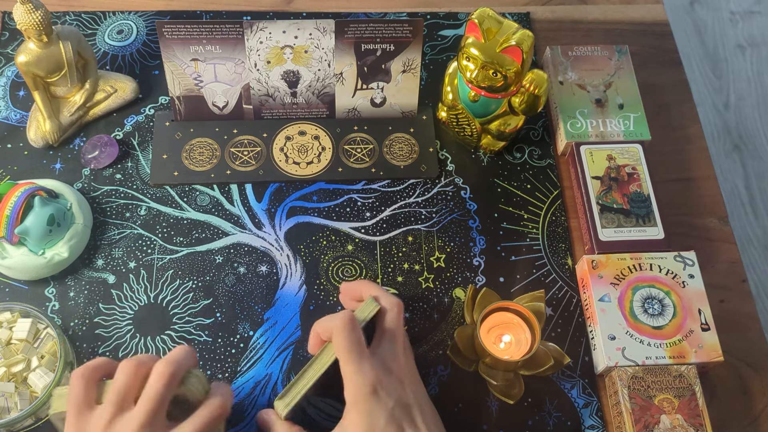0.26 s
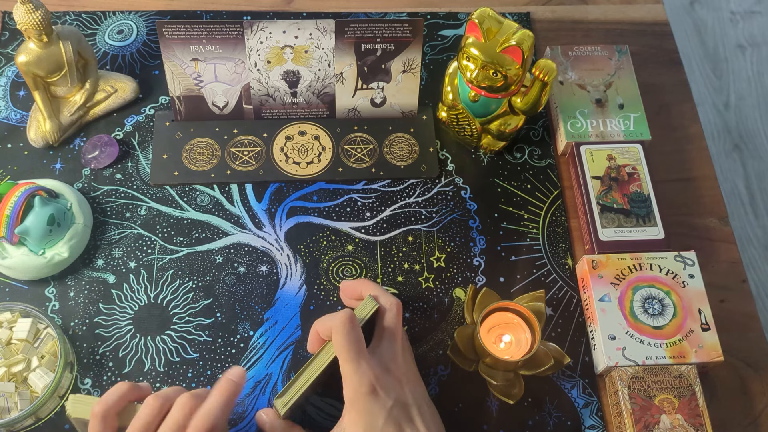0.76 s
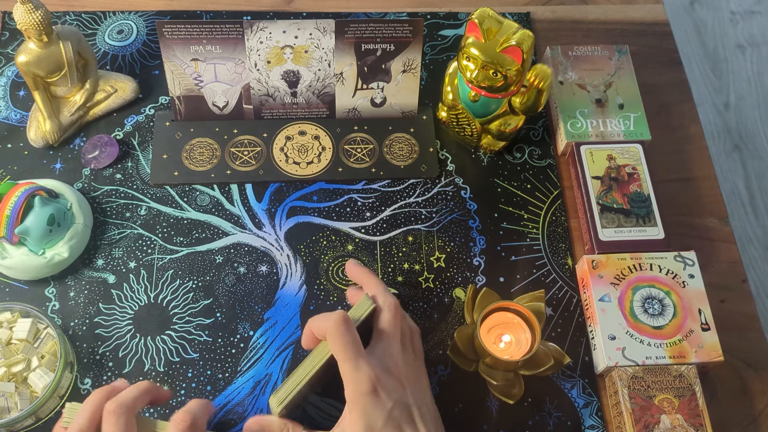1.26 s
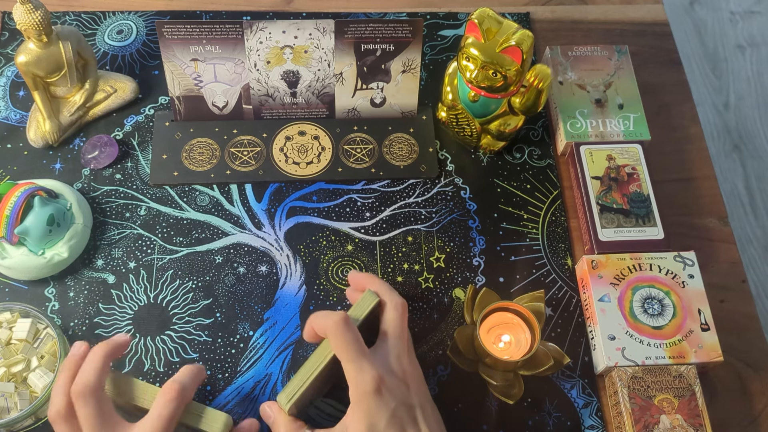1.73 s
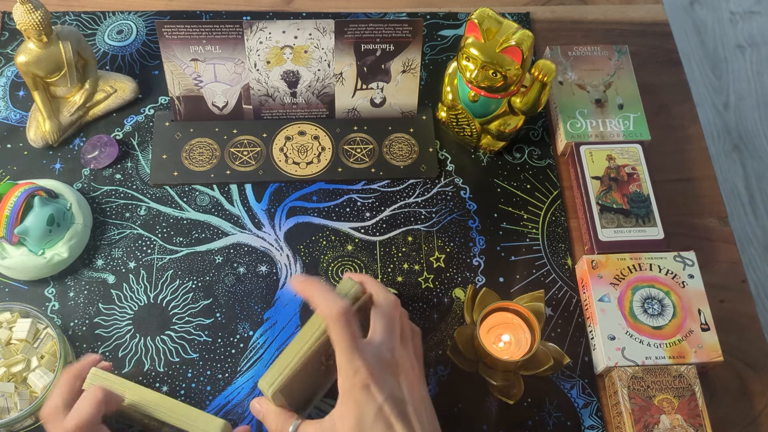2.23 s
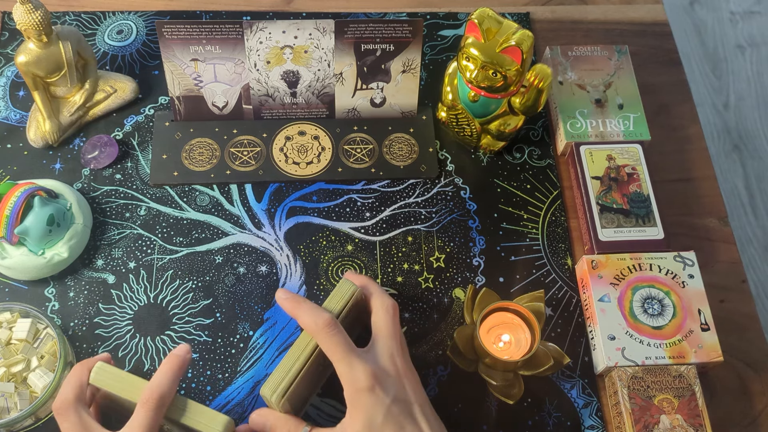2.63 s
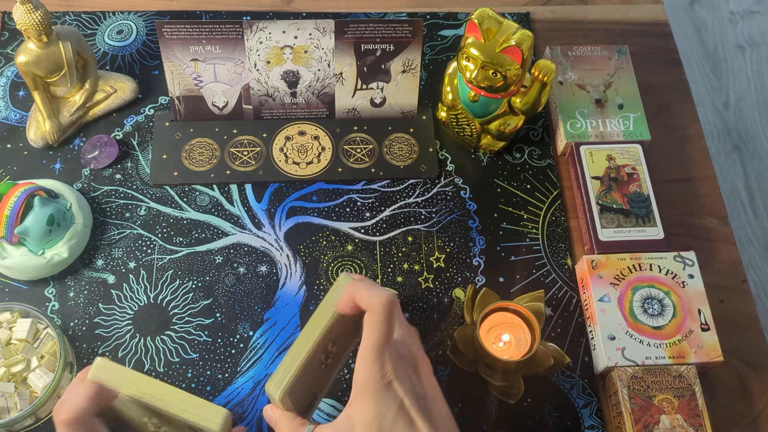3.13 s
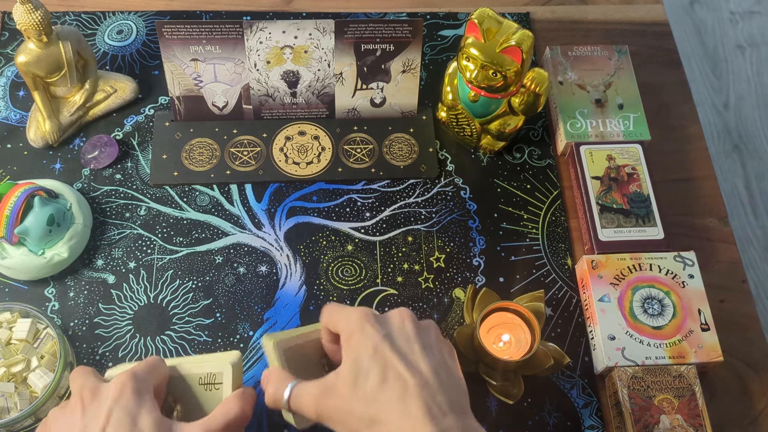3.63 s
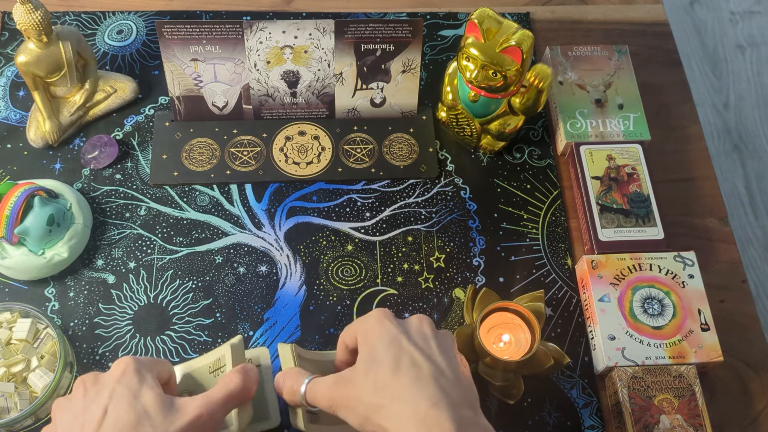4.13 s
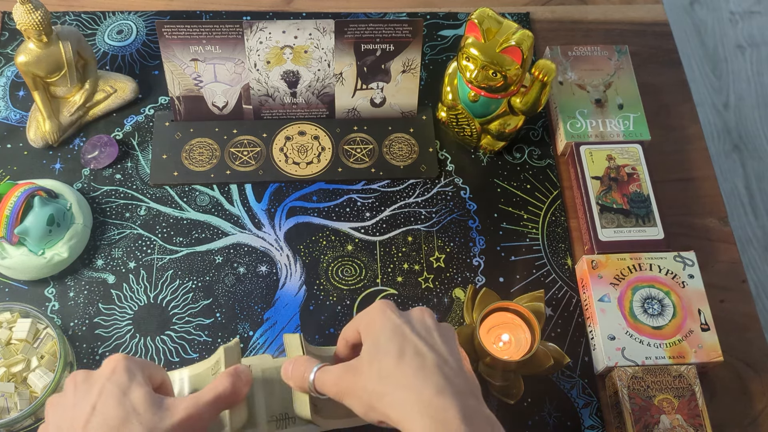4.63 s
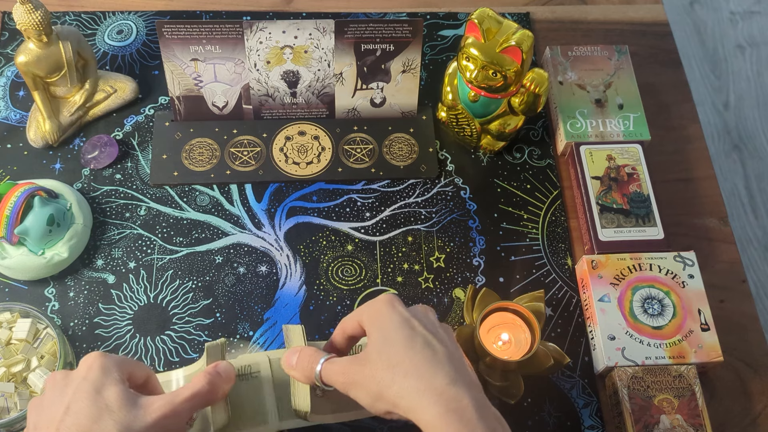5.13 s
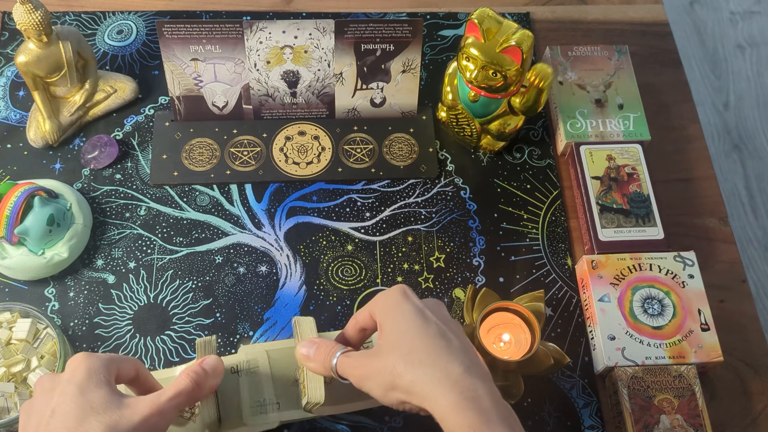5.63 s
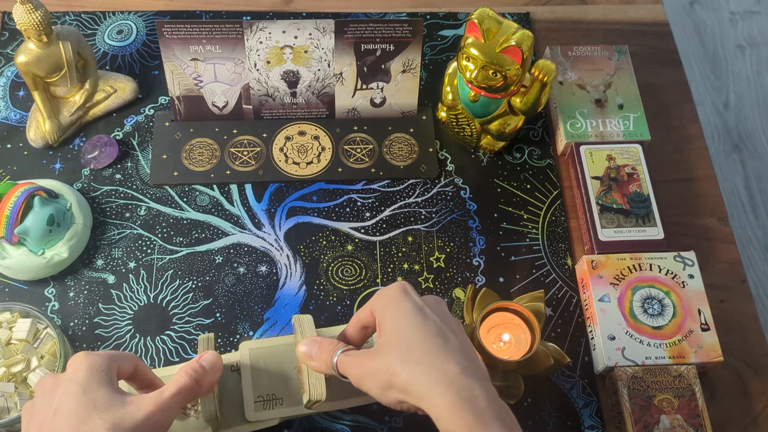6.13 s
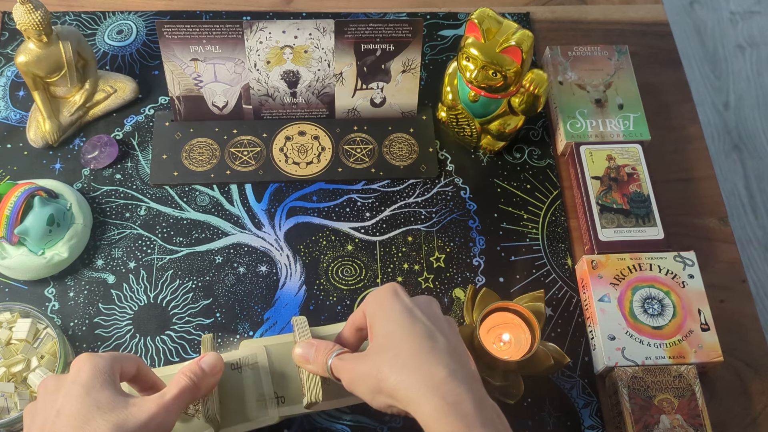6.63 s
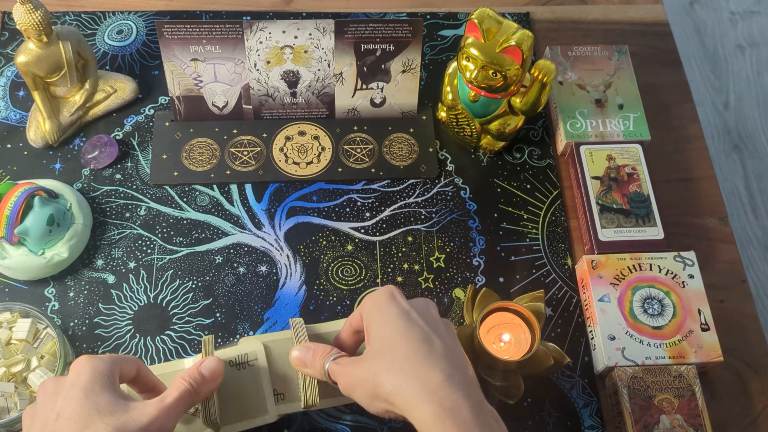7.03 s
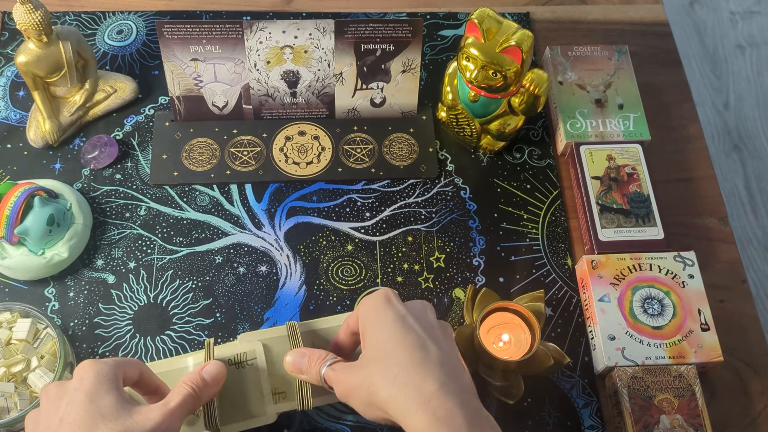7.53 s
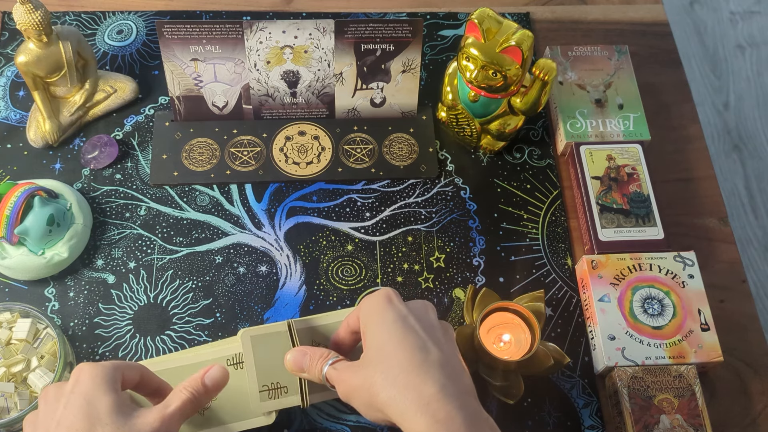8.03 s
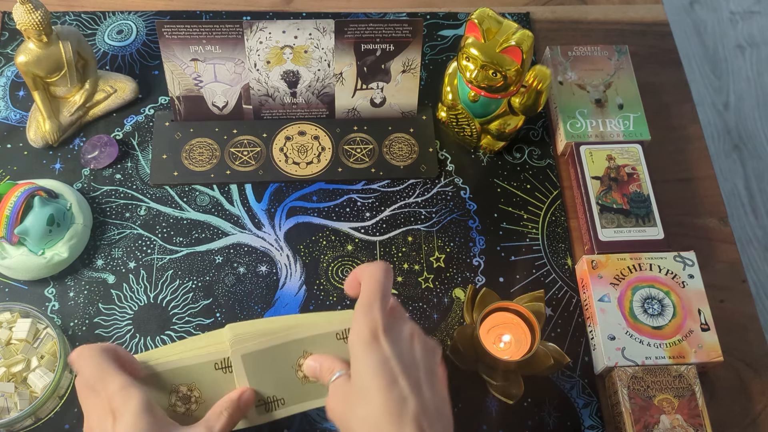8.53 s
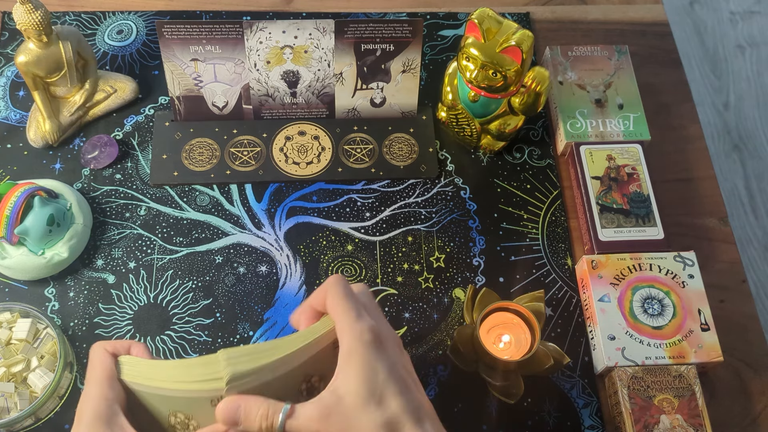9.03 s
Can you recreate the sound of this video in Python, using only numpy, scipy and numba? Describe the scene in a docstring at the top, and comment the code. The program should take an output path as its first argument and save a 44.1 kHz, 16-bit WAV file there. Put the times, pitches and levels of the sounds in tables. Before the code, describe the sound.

Two halves of a deck of stiff cards are knocked square on a cloth-covered wooden table, making a few dull thuds. After a pause comes a slow riffle shuffle: cards spring off the thumbs in sharp, uneven cracks and pat onto the pile. Soft sliding and creaking follow as the halves are pushed together. It sounds close, in a small, slightly echoing room with a low hum.

```python
"""Stiff playing cards are riffled: each bent card springs off the thumb with a crack and a clack,
then pats onto the pile. Beforehand the two half decks are knocked square, exciting the modes of a
cloth-covered wooden table. Friction adds slides, creaks and brushing, last as the halves are pushed
together and arched. A small, live room reverberates over mains hum, rumble and faint hiss."""
import sys
import numpy as np
from scipy import signal
from scipy.fft import rfft, irfft
from scipy.io import wavfile
from numba import njit

SR = 44100
rng = np.random.default_rng(int(sys.argv[2]) if len(sys.argv) > 2 else 0)


def file_out(sig):
    """Save sig as 16-bit WAV at sys.argv[1]."""
    # one column per channel
    cols = np.atleast_2d(sig).T
    # limit, then scale
    lim = np.clip(cols, -1, 1)
    pcm = np.round(lim * 32767).astype(np.int16)
    wavfile.write(sys.argv[1], SR, pcm)


N = 408807

# Cards leaving the thumb. Each row: time in seconds, crack level in dB, crack resonance in Hz, clack
# level in dB, clack resonance in Hz, first-touch level in dB, pat level in dB, left minus right in dB.
# Event levels in all tables are relative: each source adds its own gain.
SNAPS = [(4.6587, -37, 8000, -24.5, 4600, -27, -36, -1), (4.7287, -25, 8000, -34, 3500, -40, -36, 4),
         (4.7535, -25, 7500, -38, 3200, -25.5, -28, -6), (4.8102, -25, 11000, -34, 2200, -27.5, -22, -1),
         (4.820, -31, 8000, -22.5, 4100, -36, -26, 1), (5.291, -34, 11000, -47, 2800, -29.5, -27.5, 6),
         (5.3365, -30, 11000, -35, 2500, -25, -20, 0.5), (5.4336, -32.5, 11000, -55, 3000, -30, -27, 2),
         (5.4562, -19.5, 10500, -38, 4200, -36, -35, 3.5), (5.5096, -16.5, 10500, -34, 3500, -26, -26, 0),
         (5.5792, -26.5, 9000, -40, 3000, -30.5, -27, 3.5), (5.68, -21, 10500, -41, 2800, -30.5, -26, -0.5),
         (5.7306, -2, 11000, -34, 4400, -42.5, -41, 0), (5.785, -4.5, 10300, -31, 3800, -31.5, -32, 5),
         (5.936, -2, 7700, -27, 4600, -28.5, -35, 3), (6.091, -17, 10500, -36, 2600, -34, -25, 0),
         (6.136, -1, 10000, -31, 3600, -35.5, -35, 2), (6.2065, -14.5, 9000, -31, 2000, -30, -25, 1),
         (6.329, -7, 8000, -23.5, 3700, -39.5, -25, 5), (6.4557, -15, 7000, -31, 2800, -47, -35, 0),
         (6.5372, -24, 8500, -36.5, 3000, -31, -32, 7), (6.5549, -1.5, 7200, -34, 3300, -44, -43.5, 3),
         (6.6578, -3, 10200, -28, 3200, -32.5, -39, 2.5), (6.7703, 0.5, 6900, -24.5, 3500, -47.5, -45, 0.5),
         (7.074, -17, 8500, -39, 2600, -41.5, -28, 1), (7.1559, -.5, 8400, -32, 2900, -48.5, -48, 4),
         (7.3772, -13, 6300, -26, 2600, -35.5, -31, 3), (7.4176, -15.5, 7000, -31, 2600, -31, -26, 7),
         (7.467, -10.5, 8300, -25, 2700, -39, -29.5, 2), (7.5253, -13, 7500, -30.5, 2500, -31.5, -24.5, 3),
         (7.5914, -10.5, 7500, -29, 2600, -36.5, -28, 2.5), (7.6473, -13, 8000, -34, 2800, -33.5, -29, 3),
         (7.7532, -.5, 7400, -25.5, 3200, -44, -35, 3.5), (7.7811, -2, 8700, -30, 3900, -34.5, -35, 6.5),
         (7.935, -12, 7500, -31, 3100, -29, -29, 4.5), (8.0043, -3.5, 8800, -21, 3700, -45, -32, 2),
         (8.122, -14, 8500, -24, 3800, -40, -27, 5), (8.269, -56, 6500, -38, 5400, -37, -33, 6.5),
         (8.983, -40.5, 9500, -55, 4800, -69, -61, 0)]
# Half decks striking the table. Each row: time in seconds, level in dB, low-pass corner in Hz, tick
# level in dB, table ring against the blow in dB, settling delay in seconds, its level in dB, its corner
# in Hz, grazing time in seconds, last graze level in dB, boom level in dB.
KNOCKS = [(0.3625, -9.5, 760, -33, -1, .011, -13, 450, 0.038, -17.5, -64),
          (0.679, -23.5, 650, -46, 0, .0133, -14, 400, 0.0002, -60, -63),
          (0.801, -17, 1220, -34, -2.5, .0133, -14.5, 400, 0.022, -22.5, -60),
          (1.690, -6, 2070, -10, -1, .011, -14, 400, .023, -10.5, -36),
          (1.720, -16, 2000, -23, -1, .011, -18, 600, 0.0002, -60, -60),
          (2.621, -15, 850, -40, -4, .011, -10.5, 560, 0.00077, -60, -37),
          (2.650, -15.5, 680, -46, -6, .011, -17, 300, 0.00077, -60, -56),
          (4.042, -40, 2020, -50, -4, .0133, -53, 400, 0.0029, -70, -82),
          (4.079, -39.5, 2000, -46, -10, .0133, -52, 400, 0.0058, -70, -87)]
# Friction spectrum of card on card. Each row: frequency in Hz, gain in dB.
CARD_FRICTION = [(300, -22.5), (1000, -11), (2000, -4), (3500, -4.5), (4600, -5.5), (6600, -0.5),
                 (9000, -11), (15000, -24.5)]
# Friction spectrum of skin on card edges. Each row: frequency in Hz, gain in dB.
SKIN_FRICTION = [(700, 2), (2000, 2.5), (4000, -2.5), (6500, -1.5), (9500, -8), (12000, -10),
                 (16000, -21.5)]


def snaps(crack_gain_db=7, clack_gain_db=21.2, lead=256):
    """Elastic release: a freed edge radiates a bright crack, and the flexing card a dry clack."""
    # Spectra of the edge, left and right, and of the card's body. Each row: frequency in Hz, gain in dB.
    edge_left = [(300, -36), (1500, -35), (4200, -15.5), (5500, -4), (7200, 0.5), (10800, 0), (12500, -9),
                 (15400, -11), (16500, -35)]
    edge_right = [(300, -29), (1500, -29), (4200, -15.5), (5500, -.5), (7200, -1.5), (10500, -5),
                  (12000, -4.5), (13500, -1), (15300, 1.5), (16500, -26)]
    card_body = [(200, -15), (600, -11), (1500, 1), (2400, 3.5), (3400, 2), (4400, -5), (5400, -0.5),
                 (6500, -6.5), (9000, -6), (16000, -12.5)]
    out = np.zeros((2, N))
    for s, crack_db, crack_hz, clack_db, clack_hz, _, _, pan_db in SNAPS:
        flutter_s = 0.0028 * np.exp(0.3 * rng.standard_normal())
        crack = burst(decay_s=.00036, ring_db=-22, ring_s=.0012, alike=1, rise_s=.0003, peak_s=.00093)
        crack = whiten(np.pad(crack, ((0, 0), (lead, 0))), .7)
        # Each card is bent differently, which moves the brightest part of its crack.
        left, right = crack + from_db(-3) * resonate(crack, crack_hz, width_hz=2400)
        edge = unit_energy(np.array([colour(left, edge_left), colour(right, edge_right)]))
        flex = burst(decay_s=.0005, ring_db=7, ring_s=flutter_s, alike=-.3, rise_s=.0005, peak_s=.00085)
        clack = colour(whiten(flex, .4), card_body)
        body = unit_energy(clack + from_db(1) * resonate(clack, clack_hz, width_hz=900))
        pan = from_db([[pan_db / 2], [-pan_db / 2]])
        add(out, s - lead / SR, from_db(crack_db + crack_gain_db) * edge * pan)
        add(out, s, from_db(clack_db + clack_gain_db) * body * pan)
    return out


def catches(gain_db=13, rebound_s=.011, rebound_db=-27.5):
    """Small impacts: an edge slips and is caught by the thumb, or flicks its neighbours after a snap."""
    # Edges catching on the thumb. Each row: time in seconds, level in dB.
    thumb_catches = [(.3625, -49.5), (2.14, -56), (2.248, -60), (4.909, -43), (4.949, -43), (5.017, -42),
                     (5.103, -45), (5.1555, -44), (5.17, -47), (5.194, -41), (5.345, -37), (5.628, -34.5),
                     (6.264, -35.5), (6.319, -36), (7.038, -33.5), (7.055, -41.5), (7.064, -28),
                     (7.147, -43.5), (7.232, -30.5), (7.367, -38.5), (8.251, -33)]
    out = np.zeros((2, N))
    rebounds = [(s + delay_s, crack_db + rebound_db - rng.uniform(0, 12))
                for s, crack_db, *_ in SNAPS
                for delay_s in rebound_s * np.cumsum(rng.uniform(0.56, 2, 2))]
    for s, db in list(thumb_catches) + rebounds:
        tick = colour(burst(decay_s=.0007, ring_db=-16.5, ring_s=.003, alike=.7), SKIN_FRICTION)
        add(out, s, from_db(db + gain_db) * unit_energy(tick))
    return out


def landings(lead_s=.0135, slap_lag_s=.0095, softer=.85, riffle_start_s=4.56, fall_hz_per_s=60):
    """Staged contact: a card touches edge first, then lies flat. Yields seconds, dB and corner in Hz."""
    # Cards dropping without a snap. Each row: time in seconds, first-touch level in dB, pat level in
    # dB, low-pass corner in Hz.
    drops = [(.3628, -60, -45, 3300), (4.5685, -37.5, -24.5, 2250), (4.948, -26.5, -26.5, 2000),
             (4.999, -27.5, -27.5, 1890), (5.016, -48, -33, 1900), (5.1685, -30.5, -31, 1870),
             (5.217, -39, -35.5, 1608), (5.252, -42, -36, 1660), (5.345, -36, -27, 1700),
             (5.7675, -30.5, -30, 1762), (5.835, -44.5, -42, 1630), (6.003, -42.5, -31.5, 1550),
             (6.186, -49.5, -35.5, 1500), (6.2635, -46, -34.5, 2440), (6.277, -46.5, -30, 1090),
             (6.337, -36, -27, 390), (6.741, -37.5, -29, 1580), (7.064, -41.5, -28, 649),
             (7.231, -35, -24.5, 1820), (7.29, -29, -28, 444), (7.909, -34, -31.5, 1187),
             (7.947, -33, -35, 493), (8.052, -35, -21.5, 1400), (8.075, -35, -31, 258),
             (8.188, -37.5, -32.5, 689), (8.586, -46, -39.5, 2530)]
    for s, _, _, clack_db, _, touch_db, pat_db, _ in SNAPS:
        corner_hz = 1900 - fall_hz_per_s * (s - riffle_start_s)   # a thicker pile is softer
        yield s - lead_s, touch_db, corner_hz * softer
        yield s, pat_db, corner_hz
        # The far end of a snapped card slaps down last.
        yield s + slap_lag_s * rng.uniform(.85, 1.2), clack_db - 7.5, corner_hz * softer
    for s, touch_db, pat_db, corner_hz in drops:
        yield s - lead_s, touch_db, corner_hz * softer
        yield s, pat_db, corner_hz


def pats(gain_db=13.7, cavity_db=3.5):
    """Cavity resonance: the gap under a landing card rings briefly, lower for a softer landing."""
    out = np.zeros((2, N))
    for s, db, corner_hz in landings():
        slap = burst(decay_s=.0015, ring_db=-12, ring_s=.0038, alike=.92, peak_s=.00075)
        pat = colour(soften(whiten(slap, .7), corner_hz), card_spectrum_of_pat())
        cavity_hz = .88 * corner_hz * rng.uniform(0.75, 1.12)
        cavity = from_db(cavity_db) * resonate(pat, cavity_hz, width_hz=380)
        add(out, s, from_db(db + gain_db) * unit_energy(pat + cavity))
    return out


def card_spectrum_of_pat():
    """Impact spectrum of a card landing flat on the pile."""
    # Each row: frequency in Hz, gain in dB.
    pat_spectrum = [(60, -4.5), (150, 2.5), (220, -7), (320, 1.5), (520, 1), (900, -.5), (1450, -.5),
                    (1850, 0), (2600, -.5), (4000, -.5), (12000, 10)]
    return pat_spectrum


def contacts(graze_gap_s=.0105, graze_step_db=1.5, graze_hz=950):
    """Multiple impact: loose cards graze the table ever harder, the packet hits, then it settles."""
    for s, db, corner_hz, tick_db, ring_db, *settling, graze_s, graze_db, _ in KNOCKS:
        settle_s, settle_db, settle_hz = settling
        count = round(graze_s / graze_gap_s)
        for k in range(count):
            early_s = graze_s * (1 - k / count * rng.uniform(.8, 1.1))
            weaker_db = (count - 1 - k) * graze_step_db
            yield s - early_s, graze_db - weaker_db, graze_hz, tick_db - 31, ring_db
        yield s, db, corner_hz, tick_db, ring_db
        yield s + settle_s, settle_db, settle_hz, tick_db - 15.5, ring_db


def knocks(wood_db=-5, thud_db=11, tick_gain_db=6, thud_s=.011, tick_s=.0012, size=12000):
    """Modal excitation: a half deck thuds, ticks and rings the table's modes, differently each time."""
    # Modes of the table top. Each row: frequency in Hz, level in dB, 60 dB decay time in seconds.
    table_modes = [(122, -18, 0.14), (156, -20, 0.18), (243.3, -30, 0.092), (292.5, -19, 0.075),
                   (329.7, -20.5, 0.068), (390, -31.5, 0.05), (434.6, -29, 0.097), (567, -23.5, 0.056),
                   (647, -27.5, 0.055), (1050, -27.5, 0.03), (1185, -23.5, 0.027), (1900, -29, .015),
                   (2170, -27.5, .015), (2900, -30, .012)]
    # Spectra of the packet's dull thud and its edges' hard tick. Each row: frequency in Hz, gain in dB.
    thud_spectrum = [(60, -51.5), (130, 15), (165, 14), (220, 0), (310, 9), (480, 5), (730, 4.5),
                     (880, -4.5), (1060, 5.5), (1200, 5), (1320, 1), (1550, -4), (2200, -21), (2500, -32),
                     (2950, -25), (3600, -30), (8000, -48)]
    tick_spectrum = [(300, -14), (850, 3), (1200, 6), (1600, 0), (2150, -1), (2500, -12), (2950, -13),
                     (3600, -32), (7000, -46), (15000, -61)]
    out, t = np.zeros((2, N)), np.arange(size) / SR
    hz, mode_db, t60 = np.transpose(table_modes)[:, :, None]
    modes = from_db(mode_db - 60 * t / t60) * np.sin(2 * np.pi * hz * t)
    for s, db, corner_hz, tick_db, ring_db in contacts():
        strengths = from_db(2 * rng.standard_normal(len(modes))) * (-1) ** np.arange(len(modes))
        wood = from_db(wood_db + ring_db) * (strengths @ modes)
        landing = unit_energy(stereo(rng.standard_normal((2, size)), .87) * np.exp(-t / thud_s))
        thud = from_db(thud_db) * colour(landing, thud_spectrum)
        edges = stereo(rng.standard_normal((2, size)), .79) * np.exp(-t / tick_s)
        add(out, s, from_db(db) * soften(wood + thud, corner_hz))
        add(out, s, from_db(tick_db + tick_gain_db) * unit_energy(colour(edges, tick_spectrum)))
    return out


def boom(hz=110.1, decay_s=0.11, rise_s=0.0081):
    """Damped oscillation: the whole table swings after each knock."""
    out, t = np.zeros((2, N)), np.arange(16000) / SR
    swing = np.sin(2 * np.pi * hz * t) * np.exp(-t / decay_s) * (1 - np.exp(-t / rise_s))
    for s, *_, db in KNOCKS:
        add(out, s, from_db(db) * swing)
    return out


def slides(gain_db=-4, resonance_db=11, width_hz=560, grain_db=4):
    """Sliding friction: grainy noise drives a resonance that glides with the cards' free length."""
    # Card faces sliding. Each row: start and length in seconds, level in dB, first and last pitch in Hz.
    moves = [(4.664, 0.074, -44, 2580, 2200), (6.092, 0.23, -53, 2050, 2600), (6.581, 0.2, -43, 3000, 3400),
             (6.842, .1, -43, 3730, 3200), (7.164, 0.062, -40, 3280, 2700),
             (7.297, 0.42, -54.5, 2670, 3600), (7.795, 0.07, -39.5, 3000, 3600),
             (8.04, 0.11, -44, 3400, 2950), (8.191, .04, -49.5, 3450, 2850), (8.282, 0.12, -57, 2900, 2500),
             (8.508, 0.21, -64.5, 2200, 1800), (8.759, 0.023, -58.5, 1700, 1600),
             (9.193, .07, -52.5, 2200, 3310)]
    t = np.arange(N) / SR
    strokes = np.array([stroke(*row[:3], attack_s=.012, release_s=.039) for row in moves])
    gain = strokes.sum(axis=0)
    glides = np.array([np.interp(t, [s, s + length_s], ends_hz) for s, length_s, _, *ends_hz in moves])
    hz = (glides * strokes).sum(axis=0) / gain
    grains = stereo(rng.standard_normal((2, N)), 0) * from_db(grain_db * drift(250))
    rub = colour(grains, CARD_FRICTION)
    ring = np.array([moving_resonance(side, hz, width_hz) for side in rub])
    return from_db(gain_db) * gain * rms_one(rub + from_db(resonance_db) * ring)


def creaks(slips_per_s=55, pitch_hz=1500, tick_db=-21):
    """Stick-slip friction: bent cards shift against each other in small hollow ticks."""
    # Spells of creaking. Each row: start in seconds, length in seconds, level in dB.
    spells = [(4.874, 0.12, -55), (5.195, 0.13, -58.5), (5.575, 0.25, -56), (7.19, .08, -55),
              (8.285, 0.117, -63.5), (8.59, 0.22, -70.5)]
    gain = sum(stroke(*row, attack_s=.015, release_s=.02) for row in spells)
    impulses = (rng.random(N) < slips_per_s / SR) * rng.uniform(.4, 1, N)
    slips = impulses * stereo(rng.choice([-1., 1.], (2, N)), .5)
    hollow = resonate(slips, pitch_hz, width_hz=280)
    return gain * rms_one(hollow + from_db(tick_db) * colour(slips, CARD_FRICTION))


def grip(gain_db=-4, slips_per_s=220, spread_db=4):
    """Structure-borne sound: many small slips of skin and card thud through the bent halves."""
    # Thudding under finger pressure. Each row: time in seconds, level in dB.
    pressure = [(4.54, -70), (4.66, -50), (5.3, -56.5), (5.6, -54), (6.75, -49.5), (6.95, -59),
                (7.07, -51.5), (7.7, -55), (8.25, -45), (8.5, -55.5), (9.1, -76), (9.22, -61.5)]
    # Spectrum of the fingers' thudding. Each row: frequency in Hz, gain in dB.
    finger_spectrum = [(50, 2), (130, 6.5), (165, 4), (210, -11.5), (310, -1.5), (500, -7), (900, -14),
                       (1400, -22), (2200, -25.5), (4000, -36.5), (12000, -51.5)]
    onsets = rng.random(N) < slips_per_s / SR
    strengths = from_db(spread_db * np.clip(rng.standard_normal(N), -2, 2))
    slips = onsets * strengths * stereo(rng.choice([-1., 1.], (2, N)), .8)
    return from_db(in_time(pressure) + gain_db) * rms_one(colour(slips, finger_spectrum))


def brushes(gain_db=-2, grain_db=2):
    """Friction noise: skin slides faintly over the card edges as the halves are squared."""
    # Hand movements. Each row: start in seconds, length in seconds, level in dB.
    moves = [(0, 0.02, -66.5), (0.352, 0.13, -67), (0.733, 0.14, -67), (1.693, .17, -68),
             (2.39, .01, -70.5), (2.651, 0.11, -65), (8.397, 0.3, -62.5), (9.18, 0.057, -61)]
    gain = sum(stroke(*row, attack_s=.031, release_s=.069) for row in moves)
    grain = from_db(gain_db + grain_db * drift(120))
    return gain * grain * rms_one(colour(rng.standard_normal((2, N)), SKIN_FRICTION))


def room(x, build_s=0.008, diffuse_hz=450, right_lag_s=.00011, size=24000, bands=20):
    """Reverberation: direct sound, early reflections and a diffuse tail that decays band by band."""
    # Reverberation time. Each row: frequency in Hz, 60 dB decay time in seconds.
    decay_times = [(100, 0.5), (400, 0.5), (1200, 0.5), (3000, 0.5), (7000, 0.42), (11000, 0.36),
                   (16000, 0.27)]
    # Strength of the tail. Each row: frequency in Hz, level against the direct sound in dB.
    tail_levels = [(100, -1), (400, -2), (1200, -3.5), (3000, -5), (5000, -5), (7000, -8.5), (11000, -7.5),
                   (16000, -6.5)]
    # Early reflections. Each row: left delay in seconds, right delay in seconds, gain in dB.
    reflections = [(.0077, 0.0078, -14.5), (0.0108, 0.0091, -14.5), (0.0113, .0126, -23.5),
                   (.0186, .0178, -21), (0.024, .0252, -21.5)]
    t = np.arange(size) / SR
    response = np.zeros((2, 2, size))   # paths from either side to either channel
    edges = np.geomspace(60, 18000, bands + 1)
    build_up = 1 - np.exp(-(t / build_s) ** 4)
    for noise, low, high in zip(rng.standard_normal((bands, 2, 2, size)), edges, edges[1:]):
        hz = np.sqrt(low * high)
        paths = np.array([stereo(pair, 1 / (1 + (hz / diffuse_hz) ** 4)) for pair in noise])
        band = signal.sosfilt(signal.butter(2, [low, high], "band", fs=SR, output="sos"), paths)
        band *= from_db(-60 * t / at_hz(decay_times, hz)) * build_up
        response += unit_energy(band) * np.sqrt((high - low) / SR) * from_db(at_hz(tail_levels, hz))
    for left_s, right_s, db in reflections:
        response[0, 0, int(left_s * SR)] += from_db(db)
        response[1, 1, int(right_s * SR)] += from_db(db)
    reflected = signal.oaconvolve(x[:, None], response, axes=2).sum(axis=0)[:, :N]
    direct = np.array([x[0], np.roll(x[1], round(right_lag_s * SR))])
    return direct + reflected


def mains_hum(mains_hz=49.37, level_db=-55, waver_db=2, waver_rad=0.14):
    """Harmonic series: multiples of the mains frequency, each wavering in level and phase."""
    # Hum partials. Each row: harmonic number, relative level in dB.
    harmonics = [(1, -6), (2, -1), (3, -15), (4, -22), (6, -26), (8, -23.5)]
    hum, t = np.zeros(N), np.arange(N) / SR
    for order, db in harmonics:
        amplitude = np.sqrt(2) * from_db(level_db + db + waver_db * drift(3.1))
        hum += amplitude * np.sin(2 * np.pi * order * mains_hz * t + waver_rad * drift(4))
    return hum


def room_air(gain_db=-54.5, diffuse_hz=450, rumble_hz=200):
    """Diffuse noise: faint hiss and a slowly changing rumble, alike at both ears only in the bass."""
    # Spectrum of the room's noise. Each row: frequency in Hz, gain in dB.
    air_spectrum = [(20, -47), (34, -30.5), (48, 10), (75, 3), (88, 0), (100, 13), (130, -1.5), (155, 2),
                    (180, -18.5), (280, -16.5), (450, -25), (700, -30), (1500, -34.5), (6500, -39.5),
                    (11500, -46.5), (13000, -67.5)]
    # Course of the rumble. Each row: time in seconds, level against its usual level in dB.
    rumble_levels = [(0, -6), (.5, -4), (.9, 0), (2.3, -2.5), (5.1, -1.5), (7.4, -1), (8.3, 1.5),
                     (9.27, 3.5)]
    mid, side = colour(rng.standard_normal((2, N)), air_spectrum)
    side = 0.27 * side + signal.sosfilt(signal.butter(2, diffuse_hz, "high", fs=SR, output="sos"), side)
    air = rms_one(np.array([mid + side, mid - side]))
    rumble = signal.sosfiltfilt(signal.butter(2, rumble_hz, fs=SR, output="sos"), air)
    return from_db(gain_db) * (air + (from_db(in_time(rumble_levels)) - 1) * rumble)


def burst(decay_s, ring_db, ring_s, alike, rise_s=.0002, peak_s=0.000908, size=1024):
    """Noise transient: a steep rise, then a fast decay plus the slower one of the card's flutter."""
    t = np.arange(size) / SR - peak_s
    fall = np.exp(-abs(t) / decay_s) + from_db(ring_db) * np.exp(-abs(t) / ring_s)
    return stereo(rng.choice([-1., 1.], (2, size)), alike) * fall * np.exp(np.minimum(t, 0) / rise_s)


def stroke(start_s, length_s, db, attack_s, release_s):
    """Exponential envelope of one hand movement: it swells, holds and dies away."""
    t = np.arange(N) / SR - start_s
    log_gain = np.minimum(t, 0) / attack_s - np.maximum(t - length_s, 0) / release_s
    return from_db(db) * np.exp(np.maximum(log_gain, -20))


def whiten(x, share):
    """Partial whitening: flatter spectral ripples make a burst dry rather than hollow."""
    length = x.shape[-1]
    spectrum = rfft(x, 2 * length)
    power = abs(spectrum) ** 2
    return irfft(spectrum / (power + .05 * power.mean()) ** (share / 2))[..., :length]


def colour(x, spectrum, size=8192):
    """Minimum-phase filter with the given spectrum, built by folding the cepstrum."""
    hz = np.arange(size // 2 + 1) * SR / size
    cepstrum = irfft(np.log(from_db(at_hz(spectrum, hz))))
    cepstrum[1:size // 2] *= 2
    cepstrum[size // 2 + 1:] = 0
    response = irfft(np.exp(rfft(cepstrum)))[:size // 2]
    return signal.fftconvolve(x, response.reshape((1,) * (x.ndim - 1) + (-1,)))[..., :x.shape[-1]]


def soften(x, hz):
    """A compliant contact acts as a low-pass filter."""
    return signal.sosfilt(signal.butter(2, hz, fs=SR, output="sos"), x)


def resonate(x, hz, width_hz):
    """Steady resonance with unit peak gain."""
    return signal.lfilter(*signal.iirpeak(hz, hz / width_hz, fs=SR), x)


@njit
def moving_resonance(x, hz, width_hz):
    """Two-pole resonance with a gliding centre."""
    y, r = np.zeros(len(x)), np.exp(-np.pi * width_hz / SR)
    for i in range(2, len(x)):
        feedback = 2 * r * np.cos(2 * np.pi * hz[i] / SR) * y[i - 1] - r * r * y[i - 2]
        y[i] = (1 - r * r) / 2 * (x[i] - x[i - 2]) + feedback
    return y


def stereo(noise, alike):
    """Mid-side mixing: two independent noises become left and right with correlation `alike`."""
    mid, side = np.sqrt(1 + alike) * noise[0], np.sqrt(1 - alike) * noise[1]
    return np.array([mid + side, mid - side]) / np.sqrt(2)


def drift(rate):
    """Random wander through `rate` Gaussian values a second."""
    knots = rng.standard_normal(N // 100)
    return np.interp(np.arange(N) / SR * rate, np.arange(len(knots)), knots)


def in_time(curve):
    """Interpolate a curve at every sample."""
    return np.interp(np.arange(N) / SR, *np.transpose(curve))


def at_hz(points, hz):
    """Interpolate a table on a log-frequency axis."""
    f, value = np.transpose(points)
    return np.interp(np.log(np.maximum(hz, 1)), np.log(f), value)


def from_db(db):
    """Decibels to gain."""
    return 10 ** (np.asarray(db) / 20)


def rms_one(x):
    """Scale to rms 1."""
    return x / np.sqrt(np.mean(x ** 2) + 1e-20)


def unit_energy(x):
    """Scale each channel to energy 1."""
    return x / np.sqrt(np.sum(x ** 2, axis=-1, keepdims=True) + 1e-20)


def add(out, s, sound):
    """Mix a short sound in at s seconds."""
    i = int(s * SR)
    out[..., i:i + sound.shape[-1]] += sound[..., :N - i]


def scene():
    """Superposition: all card sounds share the room, over its hum and air."""
    squaring = knocks() + boom() + brushes()
    riffle = snaps() + catches() + pats() + creaks() + slides() + grip()
    return room(squaring + riffle) + mains_hum() + room_air()


def record(dry, low_cut_hz=38, high_cut_hz=16400):
    """Band limiting: the deepest bass is cut, peaks clip at full scale, then the top is cut."""
    thinned = signal.sosfilt(signal.butter(6, low_cut_hz, "high", fs=SR, output="sos"), dry)
    clipped = np.clip(thinned, -1, 1)
    return signal.sosfilt(signal.ellip(10, .1, 70, high_cut_hz, fs=SR, output="sos"), clipped)


dry = scene()
out = record(dry)
file_out(out)
```